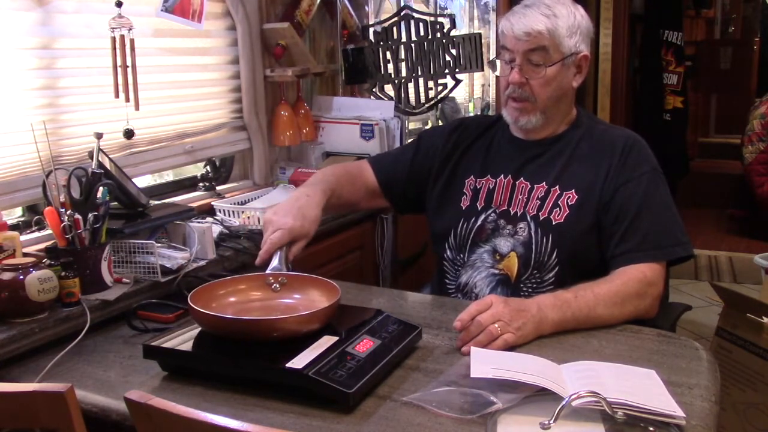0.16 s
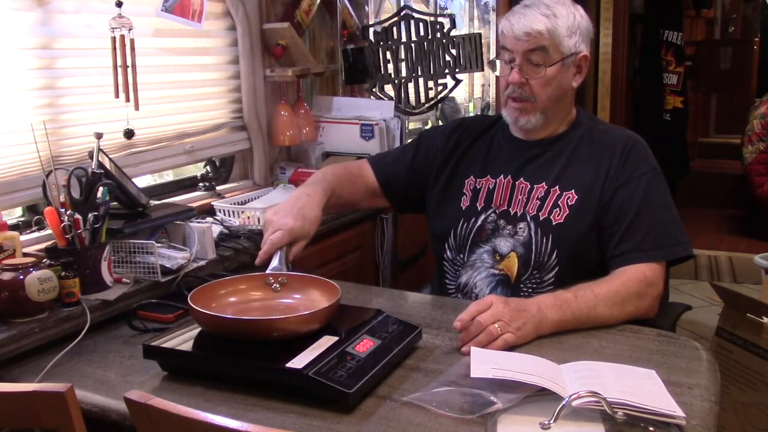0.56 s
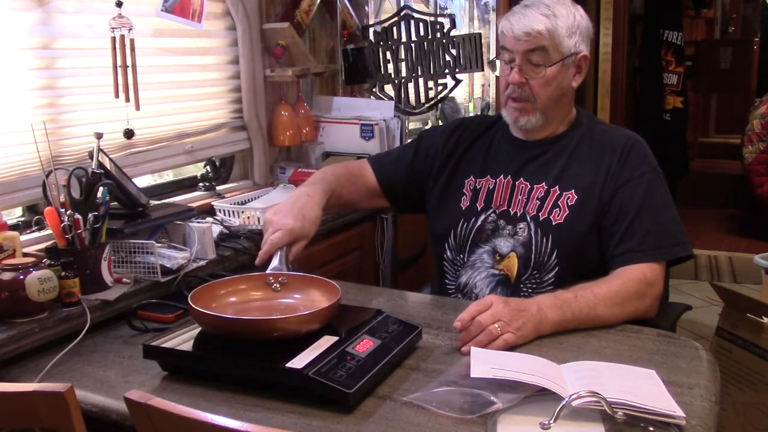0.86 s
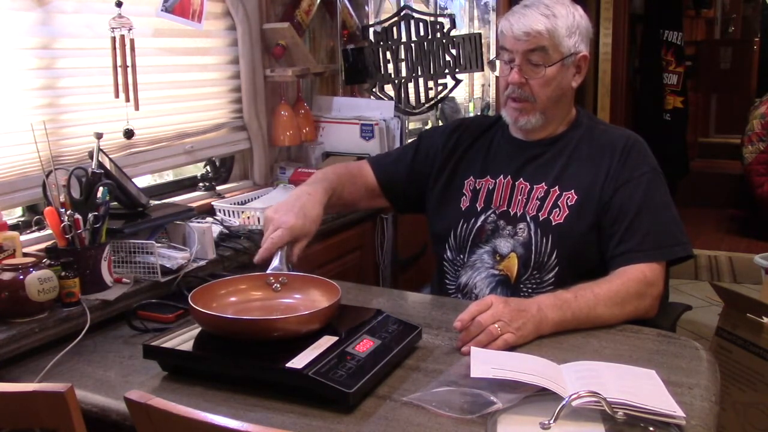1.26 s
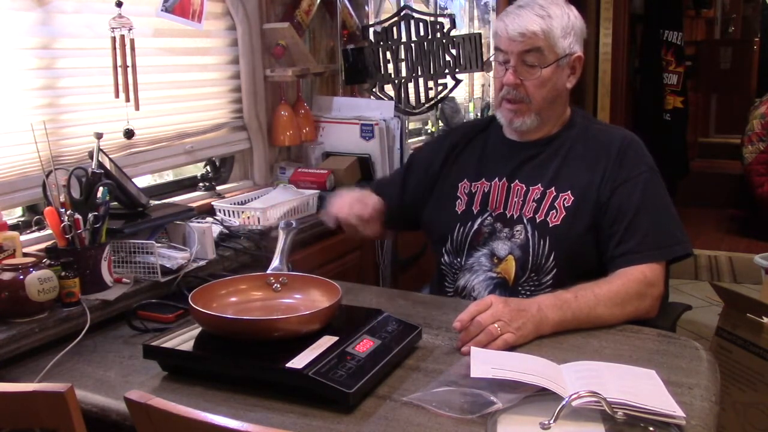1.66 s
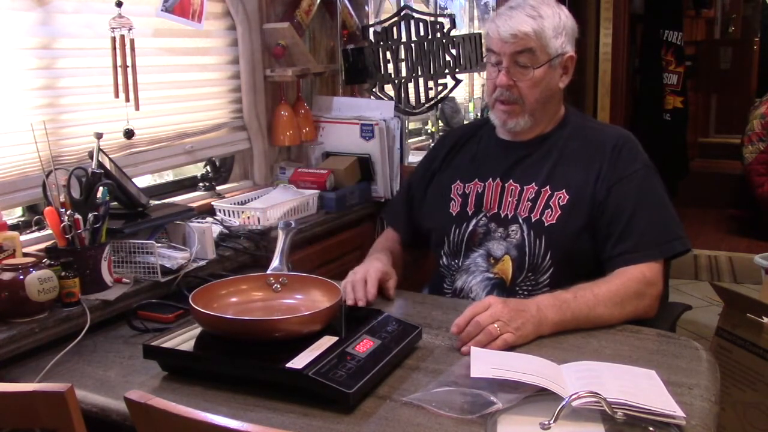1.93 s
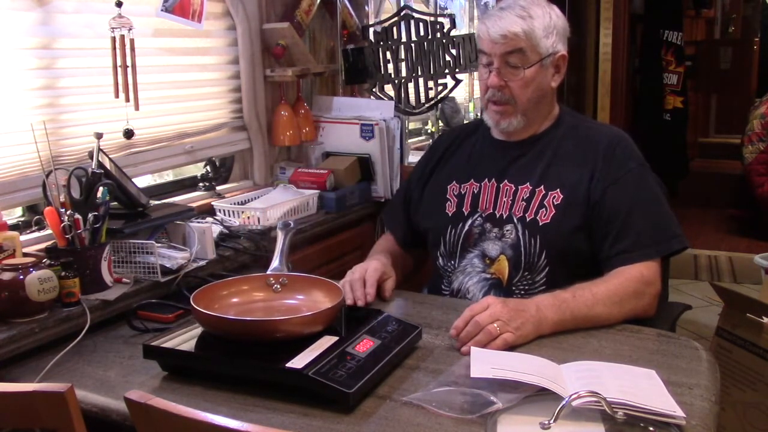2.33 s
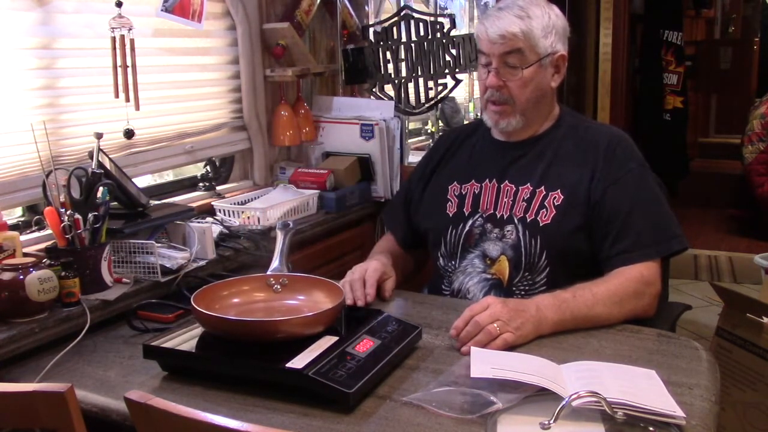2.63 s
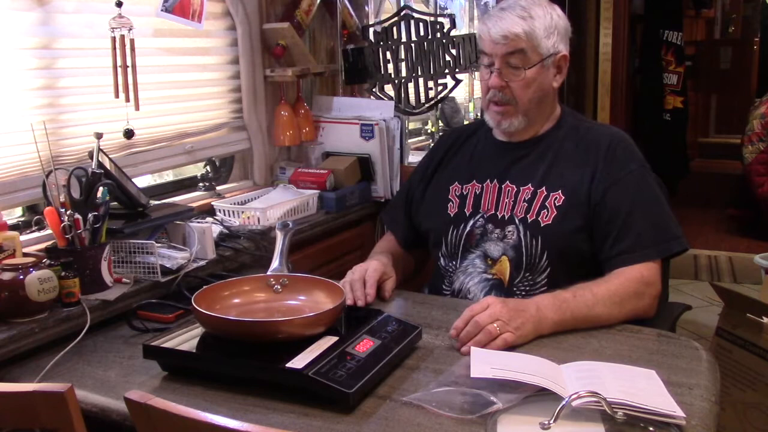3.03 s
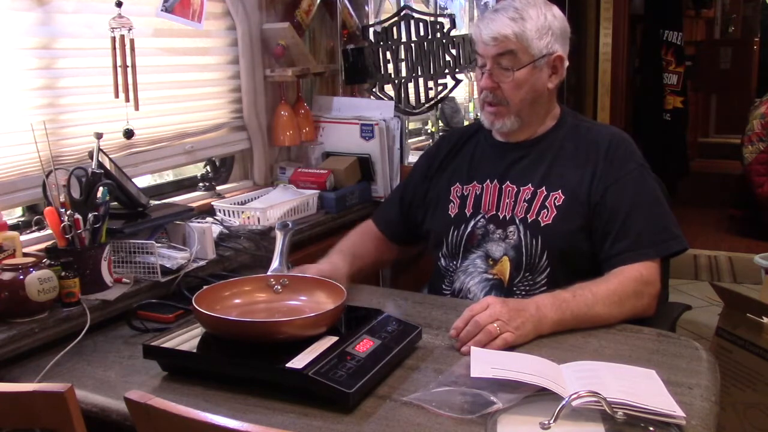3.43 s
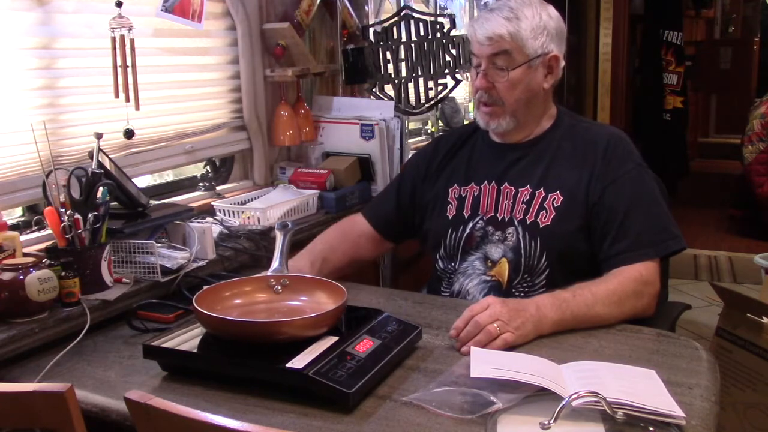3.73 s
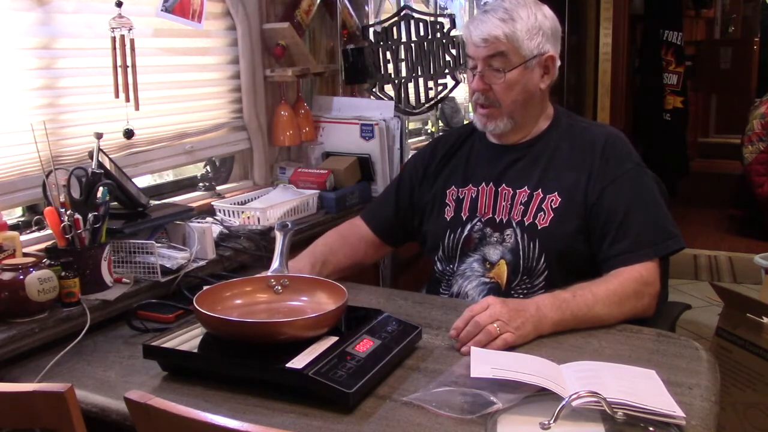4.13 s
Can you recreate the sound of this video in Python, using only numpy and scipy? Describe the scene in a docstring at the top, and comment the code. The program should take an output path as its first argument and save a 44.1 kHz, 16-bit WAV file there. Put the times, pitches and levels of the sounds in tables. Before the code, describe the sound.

Heard close by in a small living space, an induction hob drives a frying pan into a continuous, shrill metallic buzz over a soft fan and a faint hum. The buzz grows brighter as the pan warms, wavers for a moment as the pan rocks, with a barely audible bump on the table, and then holds as a more focused whine. A lower rasp comes and goes.

```python
"""Frying pan on an induction hob

The coil's field swells every mains half-cycle and the pan rings twice: a short knock, a longer swell.
The buzz builds as the pan warms and a lower rasp cuts in and out, over the case's hum and a cooling fan.
The hand lets go; the pan rocks briefly and settles into a narrower whine. A forearm bumps the table."""
import sys
import numpy as np
from scipy import signal
from scipy.fft import rfft, irfft
from scipy.io import wavfile
from scipy.ndimage import uniform_filter1d

SR = 44100
rng = np.random.default_rng(int(sys.argv[2]) if len(sys.argv) > 2 else 0)


def put_to_file(sound):
    """Save the sound as 16-bit audio at rate SR, in the file named by the first command-line argument."""
    columns = np.atleast_2d(sound).T  # one column per channel
    safe = np.clip(columns, -1, 1)
    whole_steps = np.round(safe * 32767)
    wavfile.write(sys.argv[1], SR, whole_steps.astype(np.int16))


N = 189189
TIME = np.arange(N) / SR
FREQS = np.fft.rfftfreq(N, 1 / SR)
BUZZ_HZ = 120.004  # twice the mains frequency
PERIOD_MS = 1000 / BUZZ_HZ
LET_GO_S, REST_S = 1.8, 2.05  # the pan rocks between these


def undb(db):
    """Decibels to gain."""
    return 10 ** (np.asarray(db) / 20)


def unit(x):
    """Scale to rms 1."""
    return x / np.sqrt(np.mean(x ** 2))


def curve(table):
    """A (time [s], value) table, per sample."""
    return np.interp(TIME, *np.transpose(table))


def colour(points, hz):
    """Gain of a (frequency [Hz], level [dB]) spectrum at hz."""
    f, db = np.transpose(points)
    return undb(np.interp(np.log(hz + 1), np.log(f), db))


def noise(gain):
    """Noise of rms 1, shaped by a gain per frequency."""
    return unit(irfft(rfft(rng.standard_normal(N)) * gain, N))


def walk(rate_hz):
    """Slow random drift, rms 1."""
    return noise(np.exp(-(FREQS / rate_hz) ** 2) * (FREQS > 0))


def after(at_s, ramp_s=0.033):
    """Ramp from 0 to 1, centred on at_s."""
    return np.clip((TIME - at_s) / ramp_s + .5, 0, 1)


def bump(ms, at_ms, sigma_ms):
    """Gaussian burst, once per half-cycle."""
    offset_ms = (ms - at_ms + PERIOD_MS / 2) % PERIOD_MS - PERIOD_MS / 2
    return np.exp(-.5 * (offset_ms / sigma_ms) ** 2)


# airflow spectrum: (frequency [Hz], relative level [dB])
AIR_SPECTRUM = [(30, -33), (130, -33), (200, -27), (290, -11.5), (400, -4), (520, -7), (700, -2),
                (1100, -4.5), (1650, -1.5), (2200, -6.5), (4000, -8), (7000, -10.5), (11000, -17),
                (15500, -56)]
# vent duct resonances: (frequency [Hz], width [Hz], boost [dB])
DUCT_MODES = [(427.7, 28.4, 9), (932, 38, 7), (1190, 130, 6.5), (1439, 70, 5), (1708.6, 140, 4)]
# blade tones: (frequency [Hz], level [dB])
BLADE_TONES = [(341.2, -56.5), (682.5, -47)]


def fan(air_db=-36, gust_db=0.4, speed_wobble=.0015, flicker_db=2):
    """Air rushes through the resonant vent duct; the blades add two wavering tones."""
    duct_db = sum(db / (1 + (2 * (FREQS - hz) / width) ** 2) for hz, width, db in DUCT_MODES)
    air = noise(colour(AIR_SPECTRUM, FREQS) * undb(duct_db)) * undb(air_db + gust_db * walk(5.2))
    clock_s = np.cumsum(1 + speed_wobble * walk(3.6)) / SR
    blades = sum(undb(db) * unit(np.sin(2 * np.pi * hz * clock_s) * undb(flicker_db * walk(3.7)))
                 for hz, db in BLADE_TONES)
    return air + blades


# case hum: (harmonic of BUZZ_HZ, pan held [dB], pan seated [dB])
HUM_PARTIALS = [(2, -76, -77), (4, -54, -55), (5, -49.5, -50), (9, -51.5, -56.5), (10, -46, -53),
                (11, -71, -64), (13, -52, -55.5), (15, -64, -76), (16, -49.5, -53), (17, -54, -55),
                (18, -63, -57.5), (19, -63, -51.5)]


def case_hum(seating, step_db=4, waver_db=2.0):
    """The coil shakes the case at low harmonics; the hum steps up as the first rasp catches."""
    quiet_db = step_db * (1 - after(RASP_SPELLS[0][0]))
    out = 0
    for k, held_db, seated_db in HUM_PARTIALS:
        db = held_db + seating * (seated_db - held_db) - quiet_db + waver_db * walk(2.7)
        cycles = round(k) * BUZZ_HZ * TIME + rng.random()
        out = out + undb(db) * np.sqrt(2) * np.sin(2 * np.pi * cycles)
    return out


# strong pan partials, relative levels: (harmonic of BUZZ_HZ, held [dB], seated [dB])
PAN_PARTIALS = [(20, -50.4, -49.0), (21, -47.2, -47.6), (22, -44.0, -44.3), (23, -50.1, -44.6),
                (24, -70.0, -46.5), (25, -49.5, -49.0), (26, -49.0, -54.0), (27, -38.7, -52.5),
                (28, -40.5, -51.0), (29, -47.0, -56.4), (33, -47.1, -43.6), (35, -49.5, -44.7),
                (37, -41.0, -43.1), (38, -36.1, -35.9), (39, -34.9, -35.1), (40, -30.8, -23.9),
                (41, -38.1, -33.0), (42, -35.4, -31.9), (43, -40.2, -42.2), (44, -36.0, -48.0),
                (45, -41.9, -41.8), (46, -48.0, -46.1), (48, -39.2, -41.1), (50, -43.5, -42.5),
                (51, -35.1, -31.1), (52, -38.3, -42.3), (53, -48.5, -39.8), (54, -50.7, -44.1),
                (57, -47.9, -46.7), (73, -55, -51), (74, -47.5, -53), (75, -51, -48), (76, -60, -43),
                (77, -56, -66)]
# other pan partials and hiss: (frequency [Hz], relative level [dB])
PAN_SKIRT = [(2300, -57), (3000, -57), (5600, -50.5), (7000, -53), (7400, -60.5), (8500, -60.5),
             (8950, -42), (9400, -60.5), (10050, -59.5), (10500, -63.5), (11300, -62.5), (11750, -53),
             (12400, -70), (14000, -59), (14400, -53), (14750, -61), (15250, -52), (15800, -53.5)]


def ring_cycles(lo_hz, hi_hz, throb, knock_ms=5.45, passes=30):
    """One half-cycle of a pan band, held and seated; the partials line up to follow the throb."""
    hz = np.arange(len(throb)) * BUZZ_HZ
    inside = (hz > lo_hz) & (hz < hi_hz)
    held, seated = colour(PAN_SKIRT, hz), colour(PAN_SKIRT, hz)
    for k, held_db, seated_db in PAN_PARTIALS:
        held[round(k)], seated[round(k)] = undb(held_db), undb(seated_db)
    gains = (held + seated) * inside
    phasors = at_knock = np.exp(-2j * np.pi * hz * knock_ms / 1000)
    for _ in range(passes):
        wave = throb * np.exp(1j * np.angle(np.fft.ifft(gains * phasors)))
        phasors = np.exp(1j * np.angle(np.fft.fft(wave)))
    # all bands cross zero together at the knock, which sharpens it
    knock_phase = np.angle(np.sum(gains * phasors / at_knock))
    phasors = 1j * phasors * np.exp(-1j * knock_phase)
    return [np.fft.ifft(state * inside * phasors).real for state in (held, seated)]


# low ring drive, strongest around the letting go: (time [s], level [dB])
LOW_DRIVE = [(0, -39.5), (1.21, -36.5), (1.34, -33), (1.66, -33.5), (2.1, -34), (2.7, -41), (3.9, -42.5),
             (4.2, -41)]
# main ring drive: (time [s], level [dB])
MAIN_DRIVE = [(0.0, -32.5), (0.52, -26.5), (1.54, -26), (1.61, -27.5), (1.67, -24.5), (2.13, -25.5),
              (2.26, -24.5), (2.81, -22.5), (3.15, -23), (3.63, -20), (3.69, -23), (4.22, -23.5),
              (4.29, -25)]
# drive as the pan warms: name -> (full level [dB], initial drop [dB], time constant [s])
WARM_UP = {"middle": (-23, 7.3, 1.6), "upper": (-27, 13.1, 0.99), "whistle": (-40, 14.3, 1.08),
           "fizz": (-38.3, 19, 0.42), "sizzle": (-36.5, 22, 0.68)}


def band_drives_db(tilt, tilt_dip_db=7, sag_db_per_s=1.13, treble_waver_db=1.13, main_waver_db=0.37):
    """Drive per band, low to high: heat builds the ring, tilt damps the low band, the treble wavers."""
    warm = {name: full_db - drop_db * np.exp(-TIME / tau_s)
            for name, (full_db, drop_db, tau_s) in WARM_UP.items()}
    low = curve(LOW_DRIVE) - tilt_dip_db * tilt
    main = curve(MAIN_DRIVE) + main_waver_db * walk(7.3)
    upper = warm["upper"] - sag_db_per_s * np.maximum(TIME - REST_S, 0)
    waver = treble_waver_db * walk(38)
    treble = [warm[name] + waver for name in ("whistle", "fizz", "fizz", "sizzle")]
    return [rasp_drive_db(), low, warm["middle"], main, upper, upper] + treble


# edges of the pan's ten bands [Hz]
BAND_EDGES_HZ = [2340, 2820, 3660, 4260, 5460, 6660, 7500, 9420, 11220, 13860, 15900]
# exponent of the seating per band; a higher one changes colour later
SEATING_EXPONENTS = [0.54, 6.1, 1, 0.39, 2.3, 1, 6.2, 1, 1, 1]
# ring per band in one half-cycle: (knock time [ms], knock sigma [ms], swell time [ms], swell sigma [ms],
# swell level [dB], band trim [dB], hiss level [dB], phase jitter [rad], flicker [dB])
BAND_RINGS = [(5.7, 1.3, 1.6, 1.8, -4, 0, -12, .2, .5), (5.7, 1.0, 1.4, 1.2, -5, 0, -20, .1, .4),
              (5.3, .55, .4, 1.1, -3, -16.5, -20, .1, .4), (5.45, .37, 1.7, 1.25, -1.8, .2, -30, .05, .2),
              (5.5, .52, 8.2, 1.6, -3, -.5, -24, .09, .3), (5.3, .6, 1.0, 2.5, -6, -12, -16, .15, .8),
              (5.5, .6, 7.9, 1.4, -.5, -.3, -17, .15, 1.5), (5.5, .45, 1.5, 2.8, -7, -9.5, -8, .4, 1.7),
              (5.8, .65, 8.0, 2.8, -8, -6, -5, .7, 1.4), (6.2, .6, 8.2, 2.6, -1, -2, -6, 1.4, 1.4)]


def pan_ring(seating, sustain=0.207, hiss_sustain=0.15, echo_db=-15, flutter_db=0.32,
             chatter_below_hz=3700, chatter_factor=1.7, tilt_delay_ms=0.067, size=4096):
    """The field rings each band of the pan twice per half-cycle; the top bands repeat least exactly."""
    rocking, tilt = pan_rocking()
    grid = np.arange(size)
    ms = grid / size * PERIOD_MS
    play = lambda cycle, t: np.interp(t * BUZZ_HZ % 1 * size, grid, cycle)
    # reflections off the moving cook make each partial waver by itself
    paths = [(rng.uniform(0.000922, .008), walk(3.2)) for _ in range(2)]
    bands = zip(BAND_EDGES_HZ, BAND_EDGES_HZ[1:], band_drives_db(tilt), SEATING_EXPONENTS, BAND_RINGS)
    out = 0
    for lo_hz, hi_hz, drive_db, exponent, ring in bands:
        knock_ms, knock_sigma, swell_ms, swell_sigma, swell_db = ring[:5]
        trim_db, hiss_db, jitter_rad, flicker_db = ring[5:]
        swell = undb(swell_db) * bump(ms, swell_ms, swell_sigma)
        throb = sustain + bump(ms, knock_ms, knock_sigma) + swell
        held, seated = ring_cycles(lo_hz, hi_hz, throb)
        # while the pan rocks, its lowest bands chatter and ring late on each tilt
        chatters = hi_hz < chatter_below_hz
        rough = chatter_factor ** (chatters * rocking)
        late_s = chatters * tilt * tilt_delay_ms / 1000
        jitter_s = rough * jitter_rad * walk(63) / (np.pi * (lo_hz + hi_hz))
        clock_s = TIME - late_s + jitter_s
        share = seating ** exponent
        direct = (1 - share) * play(unit(held), clock_s) + share * play(unit(seated), clock_s)
        echo = sum(sway * play(unit(held + seated), clock_s - lag_s) for lag_s, sway in paths) / 2
        tone = unit(direct + undb(echo_db) * echo)
        hiss = noise(colour(PAN_SKIRT, FREQS) * (FREQS > lo_hz) * (FREQS < hi_hz))
        hiss = unit(hiss * play(throb + hiss_sustain, clock_s))
        flicker = undb(rough * flicker_db * walk(66))
        band = (tone + rough * undb(hiss_db) * hiss) * flicker
        out = out + undb(drive_db + trim_db) * unit(band)
    return out * undb(flutter_db * walk(25))  # uneven coil power


# spells of the lower rasp: (start [s], end [s], level [dB])
RASP_SPELLS = [(0.598, 1.247, -41), (1.25, 2.299, -38.5), (2.582, 2.64, -36.5), (2.679, 2.91, -36),
               (3.155, 3.3, -35.5), (3.457, 3.535, -36.5), (3.562, 3.703, -36.5), (3.96, 4.29, -37)]


def rasp_drive_db(idle_db=-44.5, kick_db=3, kick_s=0.0063):
    """The pan's lowest band catches with a small kick and drops back at once."""
    db = np.full(N, float(idle_db))
    for start_s, end_s, level_db in RASP_SPELLS:
        on = (TIME >= start_s) & (TIME < end_s)
        db[on] = level_db + kick_db * np.exp(-(TIME[on] - start_s) / kick_s)
    return uniform_filter1d(db, size=200)


def pan_rocking(rock_hz=10.04):
    """The released pan rocks on the glass: gate and tilt, both 0 to 1."""
    rocking = after(LET_GO_S) - after(REST_S)
    return rocking, rocking * np.sin(np.pi * rock_hz * (TIME - LET_GO_S)) ** 2


def pan_seating(release_share=0.44, creep_s=0.25):
    """0 held, 1 seated: a step as the hand lets go, then a creep once the pan is at rest."""
    creep = 1 - np.exp(-np.maximum(TIME - REST_S, 0) / creep_s)
    return np.clip(release_share * after(LET_GO_S) + (1 - release_share) * creep, 0, 1)


def forearm_thud(at_s=1.87, sigma_s=0.085, centre_hz=202, sigma_hz=45, level_db=-64):
    """The cook's forearm settles on the table top with a soft, dull bump."""
    thud = noise(np.exp(-.5 * ((FREQS - centre_hz) / sigma_hz) ** 2))
    return thud * undb(level_db) * np.exp(-.5 * ((TIME - at_s) / sigma_s) ** 2)


def scene():
    """Pan, hob, fan and forearm, in mono."""
    seating = pan_seating()
    return (pan_ring(seating) + case_hum(seating) + fan() + forearm_thud())[None]


def record(dry):
    """Steep low-pass at 15720 Hz."""
    return signal.sosfilt(signal.ellip(16, .1, 80, 15720, fs=SR, output="sos"), dry)


dry = scene()
out = record(dry)
put_to_file(out)
```